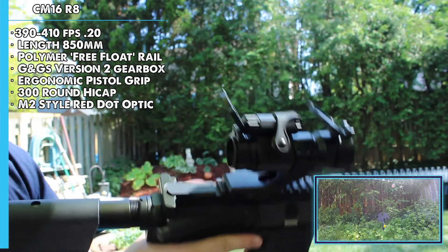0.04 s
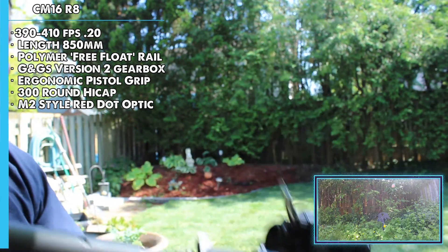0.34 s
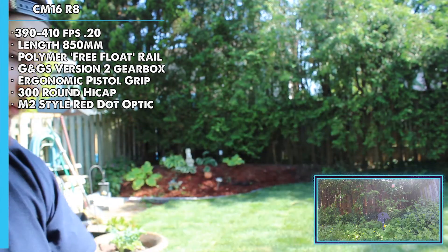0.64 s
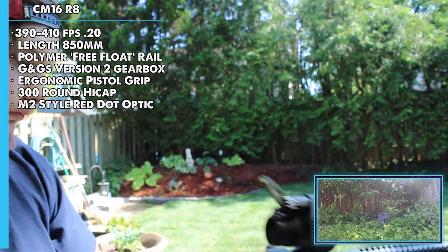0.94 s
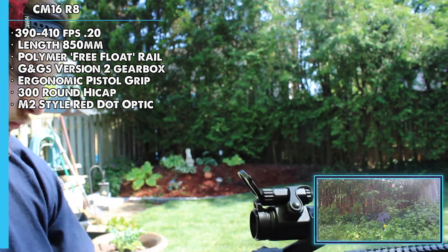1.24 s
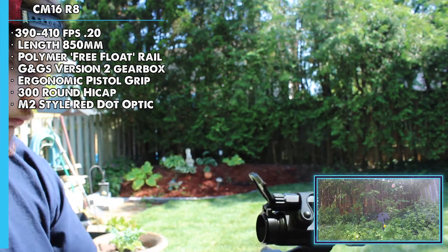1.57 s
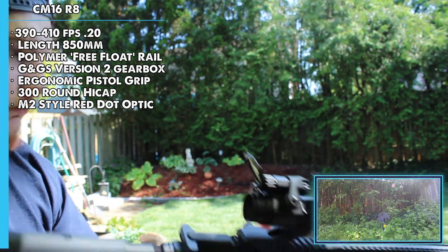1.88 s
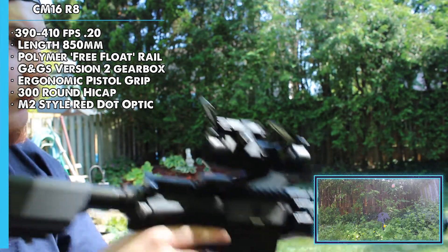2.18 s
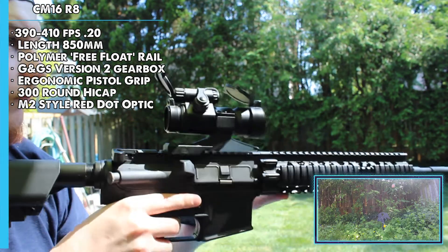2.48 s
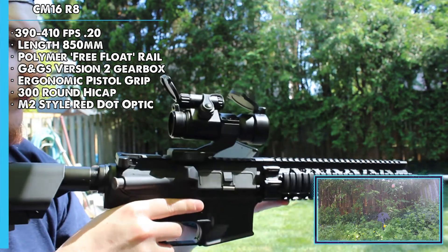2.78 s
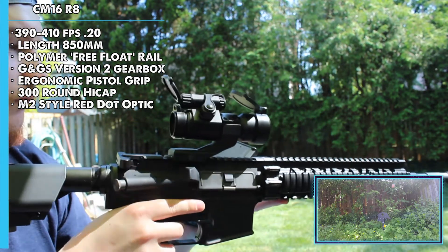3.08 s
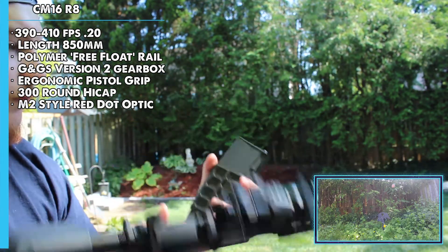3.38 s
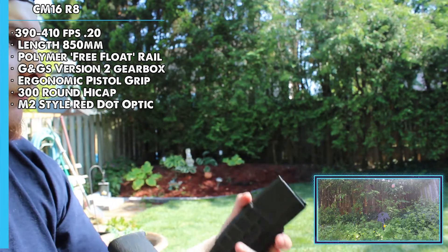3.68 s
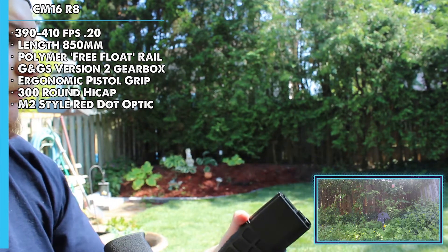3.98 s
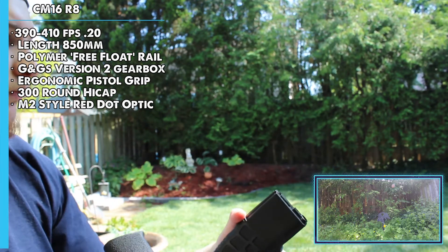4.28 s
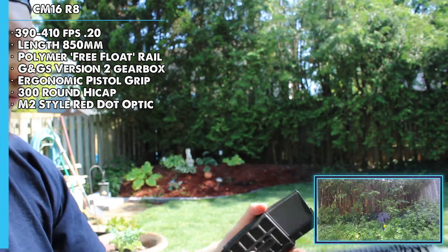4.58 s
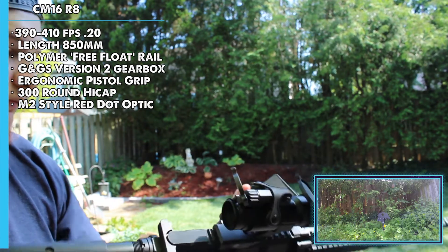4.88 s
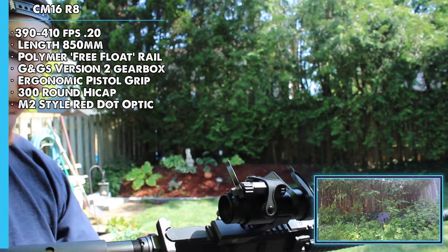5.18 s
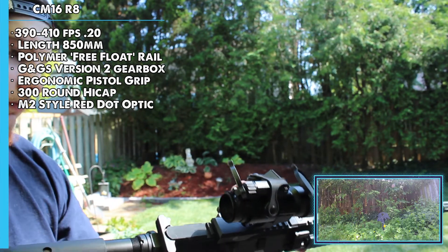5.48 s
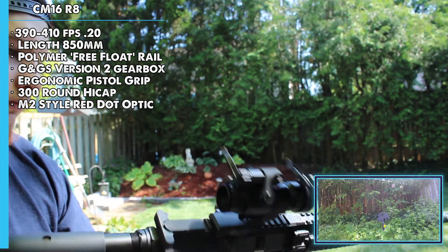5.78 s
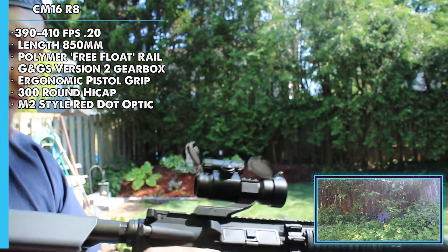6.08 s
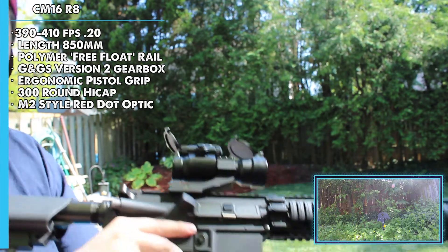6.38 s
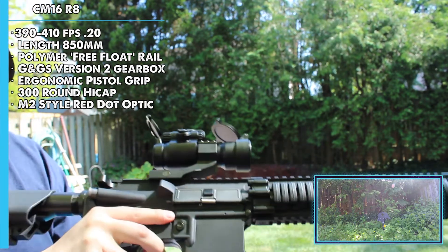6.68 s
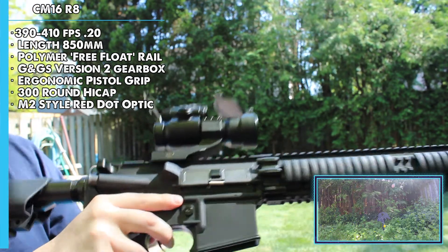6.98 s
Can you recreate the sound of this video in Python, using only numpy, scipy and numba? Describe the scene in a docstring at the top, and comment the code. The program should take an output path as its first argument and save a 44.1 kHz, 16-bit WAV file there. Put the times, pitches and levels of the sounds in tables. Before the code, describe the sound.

An electric airsoft rifle is handled close to the microphone in a garden, over a soft rush of distant town noise and the faint low hum of a far machine. From about 0.3 to 2.5 seconds, hands and a sleeve rub the plastic while loose parts tap and clink. The gun fires empty at 2.7, 3.05 and 4.2 seconds, each shot a very short rising gear whine ending in a loud, hard snap; these are the loudest sounds, and the background dips briefly after them. A few light taps follow. Sparrows chirp faintly, once near 2.1 seconds and several times from 4.4 onward. At 5.6 seconds the selector lever gives one sharp click. From about 5.8 a farther bird rasps faintly, a plastic joint creaks in dry ticks with more rubbing between 6.3 and 6.6, and soft wind puffs bump the microphone until about 7 seconds.

```python
"""An electric airsoft rifle is handled in a garden, over soft town noise and the hum of a far machine.
First, hands and a sleeve rub the gun and loose parts tap. Then it fires three times, empty: each time
gears whine as they wind the spring, the piston snaps forward, and gain control turns the sound down.
Sparrows chirp, mostly after the shots, and the selector lever clicks. Near the end a farther bird
rasps, a plastic joint creaks under the grip, and puffs of wind bump the microphone."""
import sys
import numpy as np
from scipy import signal
from scipy.fft import rfft, irfft
from scipy.io import wavfile
from numba import njit

SR = 44100
rng = np.random.default_rng(int(sys.argv[2]) if len(sys.argv) > 2 else 0)


def dump_mix(stems):
    """Bounce the given channels to the path in sys.argv[1] as a 16-bit WAV at rate SR."""
    frames = np.atleast_2d(stems).T  # one column per channel
    limited = np.clip(frames, -1, 1)  # hard clip at full scale
    pcm = np.round(limited * 32767).astype(np.int16)
    wavfile.write(sys.argv[1], SR, pcm)


N = 314874

# The three shots. Each row: time of the snap in seconds, motor level in dB, snap level in dB,
# winding time in seconds, groan level in dB, motor brightness in dB per octave.
SHOTS = [(2.6981, -21, 8, 0.12, -44, -0.5), (3.0500, -23.5, 1.5, 0.11, -57.5, -0.5),
         (4.1770, -25, 4, .111, -33, 0)]
# The tone of a small part ticking. Each row: frequency in Hz, level in dB.
TICK_TONE = [(180, -50), (300, -16.5), (930, -1.5), (1870, 2.5), (2440, -3), (2930, 0.5), (4440, -4),
             (6960, 1.5), (11500, -15.5), (16000, -23)]


def motor():
    """The gears groan and speed up, slow as the spring tightens, and coast once the piston is let go."""
    # How well the gearbox lets the whine through. Each row: frequency in Hz, level in dB.
    gearbox_tone = [(800, -15), (1250, -8), (1600, -14), (1950, 8), (2400, -9), (3000, -10.5), (3800, -1.5),
                    (4700, -10), (5500, -9), (8500, -18)]
    # The tone of rattling teeth. Each row: frequency in Hz, level in dB.
    rattle_tone = [(150, -22.5), (871, -12.5), (1390, 1.5), (1530, -6), (2100, -2.5), (2980, -7.5),
                   (4000, -4), (5460, -5.5), (8070, -9.5), (14000, -26), (16000, -37.5)]
    # The tone of gears taking up the spring. Each row: frequency in Hz, level in dB.
    groan_tone = [(250, -31), (550, -6.5), (800, 2.5), (1200, 0), (1800, -22)]
    top_hz, spin_up_s, coast_s = 1415, .063, .18  # the pitch is how many teeth meet each second
    sag_after_s, sag_hz_per_s = .071, 5800
    shaft_teeth, rasp_db = 10, 3  # the gears rasp once for each turn of the motor shaft
    out = np.zeros(N)
    t = np.arange(SR * 2 // 5) / SR
    spin_up = np.sin(np.pi / 2 * np.minimum(t / spin_up_s, 1))
    surge_db = 4 * np.exp(-((t - .036) / .01) ** 2)  # teeth press hardest while speeding up
    take_up = np.exp(-((t - .028) / .012) ** 2)
    for s, db, _, winding_s, groan_db, tilt in SHOTS:
        free_s = np.maximum(t - winding_s, 0)
        sag_hz = sag_hz_per_s * (np.clip(t, sag_after_s, winding_s) - sag_after_s)
        hz = np.maximum((top_hz * spin_up - sag_hz) * (1 - free_s / coast_s), 1)
        speed_db = 6 * np.log2(hz / top_hz)  # slower gears are quieter
        unloaded_db = -20 * np.minimum(free_s / .009, 1)  # free gears whine less
        cycles = np.cumsum(hz * (1 + .007 * drift(len(t), 400))) / SR
        whine = 0
        for k in range(1, 7):
            # No two teeth meet alike, so each overtone flutters.
            flutter_db = 1.8 * drift(len(t), 200) + 2.2 * drift(len(t), 40)
            overtone_db = read(gearbox_tone, k * hz) + tilt * np.log2(k / 2) + flutter_db
            whine += amp(overtone_db) * np.cos(2 * np.pi * (k * cycles + rng.random()))
        meshing = 1 + .8 * np.cos(2 * np.pi * cycles)
        shaft_rasp = amp(rasp_db * (t < winding_s) * np.cos(2 * np.pi * cycles / shaft_teeth))
        teeth = grains(len(t), per_s=10000, spread_db=2.2) * meshing * shaft_rasp
        rattle = unit(colour(teeth, rattle_tone, tilt))
        groan = unit(unit(colour(teeth, groan_tone)) + 2 * np.sin(2 * np.pi * cycles))
        gears = amp(db + surge_db + speed_db) * (amp(unloaded_db - 1) * whine + amp(-5.8) * rattle)
        add(out, s - winding_s, gears + amp(groan_db) * take_up * groan)
    return out


def piston():
    """The spring slams the piston home and the body thuds; then a latch catches the gears."""
    # The gear lets go, the piston lands and bounces.
    # Each row: time from the snap in seconds, level in dB, strength of the push next to the crack.
    contacts = [(-.004, -18.5, 2), (0, 3, 5), (.0013, -2, 2), (.0042, -10, 2)]
    # The tone of the snap. Each row: frequency in Hz, level in dB.
    snap_tone = [(120, -34), (280, -15), (450, -1), (1330, 4), (2130, 1.5), (2690, -7.5), (4380, 1.5),
                 (5650, 1), (8280, -4), (10200, -11), (12700, -23), (16000, -39)]
    # The low notes of the hollow body. Each row: pitch in Hz, level in dB.
    body_notes = [(200, -19), (365, -14.5), (520, -17), (760, -17)]
    thud_t60, latch_s, latch_db = .019, .079, -26  # a t60 is the seconds it takes to fade by 60 dB
    out = np.zeros(N)
    t = np.arange(SR // 20) / SR
    thud = sum(amp(db - 60 * t / thud_t60) * np.cos(2 * np.pi * hz * t) for hz, db in body_notes)
    for s, _, db, *_ in SHOTS:
        for delay, contact_db, push in contacts:
            snap = knock(snap_tone, crack_t60=.013, ring_db=-23, push=push)
            add(out, s + delay, amp(db + contact_db + 4.5) * snap)
        add(out, s, amp(db + 2) * thud)
        add(out, s + latch_s, amp(db + latch_db) * knock(TICK_TONE, crack_t60=.03, ring_db=-22))
    return out


def knock(tone, crack_t60, ring_db, tilt=0, push=0, size=4096):
    """One hard hit: a push, a noisy crack and a ring of the gun's frame, cut short by the hand."""
    # The notes at which the frame rings. Each row: pitch in Hz, level in dB.
    frame_notes = [(374, -4.5), (808, -12), (1318, -12), (1780, -0.5), (2594, -20.5), (3700, -12.5),
                   (5038, -0.5)]
    ring_t60 = .028
    t = np.arange(size) / SR
    crack = push * (t == 0) + rng.choice([-1, 1], size) * amp(-60 * t / crack_t60)
    ring = sum(amp(db) * np.sin(2 * np.pi * (hz * t + rng.random())) for hz, db in frame_notes)
    hit = colour(crack + amp(ring_db - 60 * t / ring_t60) * ring, tone, tilt)
    return hit / abs(hit).max()


def clicks():
    """Loose parts tap the frame or clink; the selector gives one sharp click."""
    # Taps of loose parts. Each row: start in seconds, level in dB, brightness in dB per octave.
    taps = [(0.323, -37.5, -0.5), (0.532, -41.5, -6.5), (0.724, -31.5, 3.5), (0.753, -33, -6),
            (0.775, -30, -1), (0.793, -27, -7), (0.83, -30.5, -7), (0.903, -28.5, 2), (0.953, -35, -0.5),
            (1.011, -32.5, -2), (1.134, -34.5, -3), (1.165, -24.5, 0), (1.182, -28.5, 2.5),
            (1.909, -30.5, -2.5), (1.921, -36, -1), (1.993, -25, 0.5), (2.045, -20, 0.5), (2.156, -33.5, 0),
            (2.306, -36, -4.5), (2.42, -40, 0.5), (3.55, -37.5, -2.5), (3.623, -38.5, -0.5),
            (3.7, -46, -0.5), (3.931, -45.5, -5.5), (4.005, -35.5, -3.5), (4.037, -39, -4),
            (4.051, -30.5, -2), (4.317, -22.5, 2), (4.505, -47.5, -4), (4.539, -40.5, -4),
            (5.052, -41.5, -2), (6.047, -41.5, -3.5), (6.15, -39, -4.5)]
    # Small parts that ring. Each row: start in seconds, level in dB, pitch in Hz, t60 in seconds.
    clinks = [(0.794, -36, 1650, .035), (1.1335, -36, 3500, .016), (1.183, -43, 1020, .045),
              (5.635, -28, 2594, .013)]
    # The selector lever drops into its notch. Each row: start in seconds, level in dB.
    selector_hits = [(5.6348, -6), (5.6394, -50), (5.6825, -39.5)]
    # The tone of that lever. Each row: frequency in Hz, level in dB.
    lever_tone = [(300, -62), (713, -11), (1040, -24), (1390, -0.5), (2250, -8.5), (2570, -0.5), (2930, -3),
                  (4520, -5.5), (5900, -2.5), (8500, 0.5), (12900, -15), (16000, -76)]
    out = np.zeros(N)
    t = np.arange(SR // 20) / SR
    for s, db, tilt in taps:
        add(out, s, amp(db) * knock(TICK_TONE, crack_t60=.027, ring_db=-17.5, tilt=tilt))
    for s, db, hz, t60 in clinks:
        add(out, s, amp(db - 60 * t / t60) * np.sin(2 * np.pi * hz * t))
    for s, db in selector_hits:
        add(out, s, amp(db) * knock(lever_tone, crack_t60=.0077, ring_db=-22.5))
    return out


def creak():
    """A plastic joint sticks and slips under the grip: a run of dry, bright ticks."""
    # The separate slips. Each row: start in seconds, level in dB.
    slips = [(6.342, -27), (6.352, -27), (6.3632, -24), (6.3664, -24), (6.377, -28), (6.386, -32),
             (6.3915, -29), (6.427, -34.5), (6.4707, -28), (6.481, -29), (6.5173, -29.5), (6.527, -30),
             (6.555, -35), (6.5776, -35), (6.616, -36)]
    # The tone of one slip. Each row: frequency in Hz, level in dB.
    slip_tone = [(300, -42), (1400, -14), (2000, 5.5), (3000, 1.5), (6000, 1), (11000, -14.5), (16000, -26)]
    out = np.zeros(N)
    for s, db in slips:
        add(out, s, amp(db) * knock(slip_tone, crack_t60=.01, ring_db=-20, push=3.4))
    return out


def rubbing():
    """Skin and cloth slide on ribbed plastic: a light touch crackles, a firm one is a brighter swish."""
    # Strokes along the gun. Each row: firmest moment in seconds, level in dB, rise in seconds,
    # fade in seconds, brightness in dB per octave.
    strokes = [(.335, -58.5, 0.034, 0.093, -0.5), (.86, -41, 0.12, 0.15, 1), (1.074, -49, 0.027, .042, 1.5),
               (1.183, -45, 0.03, 0.061, 0.5), (1.385, -46.5, 0.091, 0.069, 1.5),
               (1.51, -45.5, 0.068, 0.11, 0.5), (1.61, -38, 0.087, 0.073, 0),
               (1.83, -49.5, 0.2, 0.16, -2.5), (1.99, -49, 0.11, 0.16, -0.5), (2.19, -53, 0.16, 0.23, 0),
               (2.539, -52, 0.17, 0.075, -2), (6.26, -50, 0.082, 0.11, -1.5), (6.378, -45, 0.068, 0.05, 1),
               (6.443, -49, 0.024, 0.02, 5), (6.525, -47.5, 0.059, 0.07, 3)]
    # The tone of the rubbing. Each row: frequency in Hz, level in dB.
    rub_tone = [(240, -37.5), (400, -10.5), (579, -14), (742, -6.5), (1350, -4.5), (1820, -2.5), (4240, -6),
                (5430, -4), (10900, -17.5), (16000, -38.5)]
    out = np.zeros(N)
    t = np.arange(-SR // 4, SR // 3) / SR
    for s, db, rise_s, fade_s, tilt in strokes:
        level_db = db + swell(t, rise_s, fade_s)
        friction = grains(len(t), per_s=12000, spread_db=2)
        catches = grains(len(t), per_s=260, spread_db=3)
        flutter = amp(1.8 * drift(len(t), 70))
        light = unit(colour(friction + 1.3 * catches, rub_tone, tilt - 1))
        firm = unit(colour((friction + .7 * catches) * flutter, rub_tone, tilt + 1))
        pressed = np.clip((level_db + 57) / 20, 0, 1)
        add(out, s + t[0], amp(level_db) * ((1 - pressed) * light + pressed * firm))
    return out


def sparrows():
    """Sparrows sing with two rough voices at once, never twice alike."""
    # The chirps. Each row: start in seconds, level in dB, a number that multiplies the pitch.
    chirps = [(2.087, -50, 1.04), (4.415, -49, 1), (4.637, -48, 1), (4.957, -47.5, 0.99),
              (5.729, -52, 1.03), (5.929, -46.5, 1.015), (6.57, -47, 1)]
    # The basic shape that each chirp varies.
    # Each row: time into the chirp in seconds, low voice in Hz, high voice in Hz, level in dB.
    chirp_shape = [(0, 2622, 3540, -13), (.018, 3080, 3650, -10), (.04, 3130, 3440, -7),
                   (.058, 3400, 3420, -7), (.078, 3080, 3316, -18)]
    out = np.zeros(N)
    t = np.arange(SR // 10) / SR
    fade = signal.windows.tukey(len(t), .3)
    for s, db, pitch in chirps:
        gap_hz = rng.uniform(-80, 180)
        low_hz, high_hz, shape_db = follow(chirp_shape, t * rng.uniform(.75, 1.1))
        wander = 1 + .024 * drift(SR, 25)[:len(t)]
        low, high = (2 * np.pi * np.cumsum(pitch * hz * (wander + .019 * drift(len(t), 600))) / SR
                     for hz in (low_hz - gap_hz / 2, high_hz + gap_hz / 2))
        side_tone = np.sin(2 * high - low)  # the voices mix in the throat and make a third tone
        song = unit(np.sin(low) + .9 * np.sin(high) + .35 * side_tone)
        add(out, s, amp(db + shape_db + 3 * drift(len(t), 90)) * song * fade)
    return out


def far_bird():
    """A farther bird rasps: its pitch shakes so fast that the note turns harsh."""
    # The calls. Each row: start in seconds, level in dB, length in seconds, middle pitch in Hz.
    calls = [(5.844, -53.5, 0.083, 2210), (6.194, -59, 0.042, 1885), (6.822, -59, 0.077, 2185)]
    out = np.zeros(N)
    for s, db, length_s, hz in calls:
        n = round(length_s * SR)
        cycles = np.cumsum(hz * (1 + .292 * drift(SR, 910)[:n])) / SR
        add(out, s, amp(db) * unit(np.sin(2 * np.pi * cycles) * signal.windows.tukey(n, .7)))
    return out


def air():
    """A distant town and leaves make a soft rush, mixed with microphone hiss."""
    # The tone of the garden air. Each row: frequency in Hz, level in dB.
    air_tone = [(74, -33.5), (125, -1.5), (318, -5), (621, -9.5), (674, -7), (1030, -7.5), (1900, -17),
                (2740, -18.5), (14000, -25)]
    # How alike left and right are. Each row: frequency in Hz, likeness from 0 to 1.
    likeness = [(60, 0.67), (240, 0.94), (950, 0.29), (3770, 0.37), (15000, 0.02)]
    hz = np.fft.rfftfreq(N, 1 / SR)
    left, other = rfft(rng.standard_normal((2, N)))
    same = np.clip(read(likeness, hz), 0, 1)
    right = same * left + np.sqrt(1 - same ** 2) * other
    lean_db = read([(120, -1), (1200, -3), (8000, -.5)], hz)  # the town lies to the right
    spectra = np.array([left, right]) * amp(read(air_tone, hz) + np.outer([.5, -.5], lean_db))
    above_bass = irfft(spectra.mean(0) * (hz > 300), N).std()
    return amp(-62 + .5 * drift(N, 3)) * irfft(spectra, N) / above_bass


def machine_hum():
    """A far machine drones in slow beats, swelling between one lull and the next."""
    # The quiet moments. Each row: time in seconds, level in dB next to the full drone.
    lulls = [(-.3, -13), (.65, -10), (1.602, -14), (2.531, -7), (3.459, -25), (4.67, -23), (5.861, -12),
             (7.25, -2)]
    hum_hz, hum_db = 93, -61
    t = np.arange(N) / SR
    hum = unit(np.sin(2 * np.pi * np.cumsum(hum_hz + 2 * drift(N, 9)) / SR))
    lull_s, lull_db = np.transpose(lulls)
    arch = np.sin(np.pi * np.interp(t, lull_s, np.arange(len(lulls)))) ** 2
    beating = np.sqrt(arch + (1 - arch) * amp(np.interp(t, lull_s, lull_db)) ** 2)
    return amp(hum_db + 1.8 * drift(N, 27)) * beating * hum


def wind():
    """A light breeze rumbles on the microphone all the time, with a few stronger puffs."""
    # The puffs. Each row: strongest moment in seconds, level in dB, rise in seconds, fade in seconds.
    gusts = [(6.13, -54, 0.28, 0.067), (6.7, -50, 0.18, 0.15), (6.83, -48, 0.039, 0.093),
             (7.03, -46, 0.021, 0.044)]
    breeze_db = -72
    t = np.arange(N) / SR
    hz = np.fft.rfftfreq(N, 1 / SR)
    tone_db = read([(8, -20), (28, -1), (60, -1), (170, -16), (600, -60), (2000, -100)], hz)
    shared, apart = map(unit, irfft(rfft(rng.standard_normal((2, N))) * amp(tone_db), N))
    rumble = shared + .12 * np.outer([1, -1], apart)
    gust_db = np.max([db + swell(t - s, rise_s, fade_s) for s, db, rise_s, fade_s in gusts], axis=0)
    return amp(np.maximum(breeze_db, gust_db)) * rumble


def echo(x, t60s, delay):
    """Scattered reflections, the same on both sides. Each row of t60s: frequency in Hz, t60 in seconds."""
    taps = rng.choice([-1., 1.], (2, SR)) * (rng.random((2, SR)) < 3000 / SR)
    taps = taps + taps[::-1]
    hz, t, bands = signal.stft(taps, SR, nperseg=256)
    tail = signal.istft(bands * amp(-60 * t / read(t60s, hz)[:, None]), SR, nperseg=256)[1]
    tail = np.pad(tail / np.linalg.norm(tail[0]), ((0, 0), (round(delay * SR), 0)))
    return signal.oaconvolve(x[None], tail, axes=1)[:, :N]


def amp(db):
    """Turns decibels into a number to multiply by."""
    return 10 ** (np.asarray(db) / 20)


def unit(x):
    """Scales a signal to an average strength (rms) of one."""
    return x / np.sqrt(np.mean(x ** 2) + 1e-20)


def read(points, hz):
    """Looks up a table by frequency, with octaves evenly spaced."""
    f, value = np.transpose(points)
    return np.interp(np.log(hz + 1), np.log(f + 1), value)


def follow(rows, t):
    """Looks up every column of a table at the times t."""
    s, *columns = np.transpose(rows)
    return [np.interp(t, s, c) for c in columns]


def add(mix, s, sound):
    """Mixes a sound in at s seconds."""
    part = mix[max(round(s * SR), 0):][:len(sound)]
    part += sound[:len(part)]


def drift(n, hz):
    """A random wobble, up to about hz times a second."""
    noise = rfft(rng.standard_normal(n))
    return unit(irfft(noise / (1 + (np.fft.rfftfreq(n, 1 / SR) / hz) ** 4), n))


def colour(x, tone, tilt=0, size=2048):
    """Filters a sound to the given tone; a tilt above zero, in dB per octave, brightens it."""
    hz = np.fft.rfftfreq(size, 1 / SR)
    db = np.maximum(read(tone, hz), -70) + tilt * np.log2(np.maximum(hz, 1300) / 3000)
    log_gain = np.log(amp(np.r_[db, db[-2:0:-1]]))
    taps = np.fft.ifft(np.exp(np.conj(signal.hilbert(log_gain)))).real  # rings only after a hit
    return signal.oaconvolve(x, taps)[:len(x)]


def grains(n, per_s, spread_db):
    """Random tiny hits of uneven size."""
    size = amp(spread_db * np.minimum(rng.exponential(1, n), 3.5))
    return unit(size * rng.choice([-1, 1], n) * (rng.random(n) < per_s / SR))


def swell(t, rise_s, fade_s, depth_db=19, roundness=1.64):
    """Level in dB of a sound that rises to its top at t = 0 and fades."""
    away = np.maximum(-t / rise_s, t / fade_s)
    return -depth_db * np.clip(away, 0, 10) ** roundness


def scene():
    """The gun is a little to the right; body and ground echo at once, house and fence later."""
    # How long the garden echoes. Each row: frequency in Hz, t60 in seconds.
    garden_t60s = [(200, 0.9), (4000, 0.66), (12000, 0.4)]
    gun = motor() + piston() + clicks() + creak() + rubbing()
    # A light gun gives off no deep bass.
    gun = signal.sosfilt(signal.butter(4, 185, "high", fs=SR, output="sos"), gun)
    song = sparrows() + far_bird()
    near = amp(-17) * echo(gun, [(300, .035), (8000, .04)], delay=.006)
    far = amp(-31) * echo(gun, garden_t60s, delay=.012)
    # The camera body scatters sound differently into its two microphones, most in the treble.
    bright_gun = colour(gun, [(200, -17), (4000, -16), (8000, -6), (15000, -5)])
    scatter = echo(bright_gun, [(200, .02), (8000, .02)], delay=.001)[0]
    stereo_gun = (gun + near + far + np.outer([1, -1], scatter)) * amp([[-2.1], [1.3]])
    trees = amp(-6) * echo(song, [(2000, .09), (5000, .09)], delay=.004)
    garden = amp(-10.5) * echo(song, garden_t60s, delay=.03)
    return stereo_gun + amp(-1) * song + trees + garden + air() + machine_hum() + wind()


@njit
def gain_control(peak, limit, attack_s, hold_s, release_s):
    """The volume falls fast while peaks pass the limit, waits, then creeps back."""
    gain, g, wait = np.ones(len(peak)), 1., 0.
    for i in range(len(peak)):
        if peak[i] * g > limit:
            g -= (g - limit / peak[i]) / (attack_s * SR)
            wait = hold_s * SR
        elif wait > 0:
            wait -= 1
        else:
            g += (1 - g) / (release_s * SR)
        gain[i] = g
    return gain


def record(dry):
    """Gain control spares the bass, the fastest peaks are squashed, and the highest treble is cut."""
    gain = gain_control(abs(dry).max(0), amp(-22), attack_s=.0032, hold_s=.26, release_s=.36)
    bass = signal.sosfiltfilt(signal.butter(2, 150, fs=SR, output="sos"), dry)
    ceiling, cutoff_hz = amp(-15.5), 15950
    drive = (bass + (dry - bass) * gain) / ceiling
    squashed = ceiling * drive / (1 + drive ** 4) ** (1 / 4)
    treble_cut = signal.firwin(511, cutoff_hz, window=("kaiser", 9), fs=SR)
    return signal.oaconvolve(squashed, treble_cut[None], "same")


dry = scene()
out = record(dry)
dump_mix(out)
```